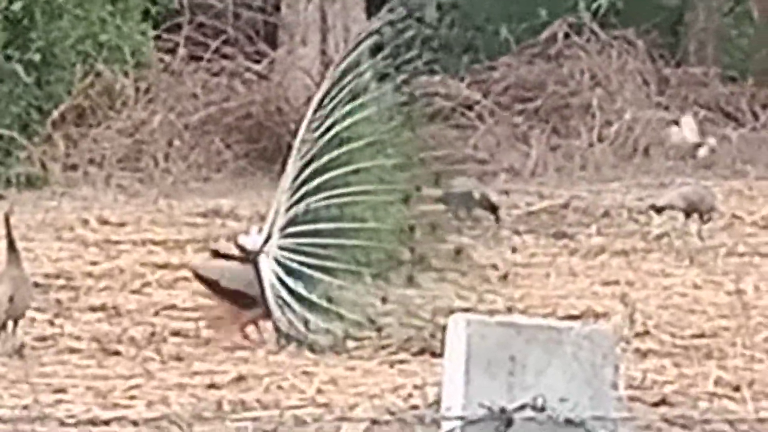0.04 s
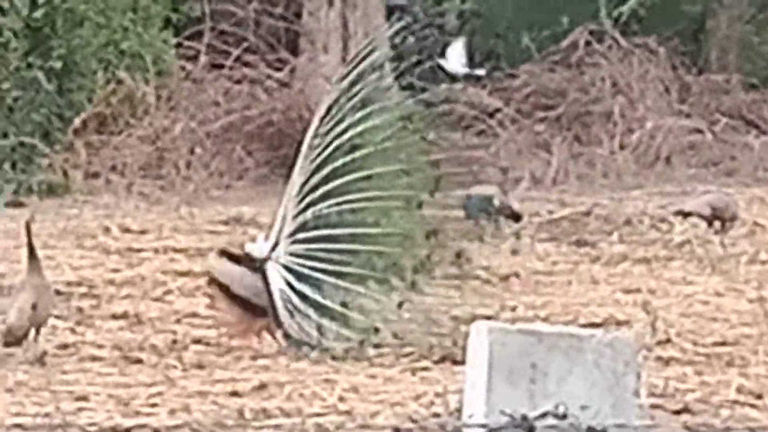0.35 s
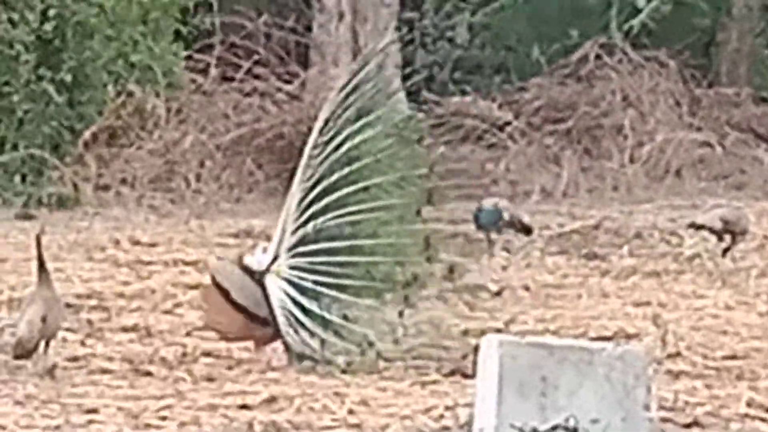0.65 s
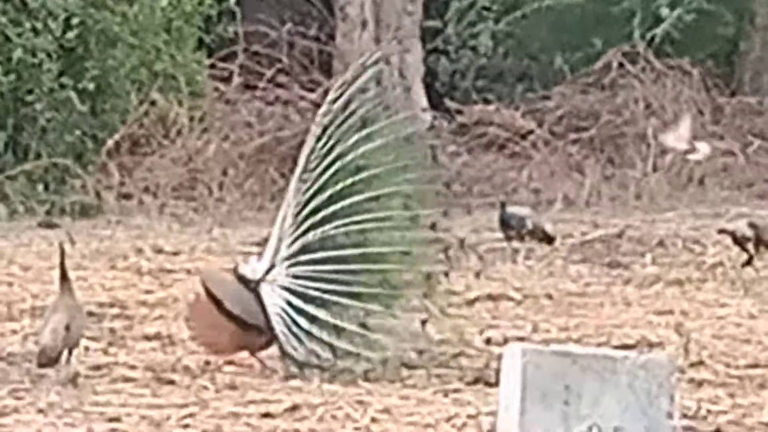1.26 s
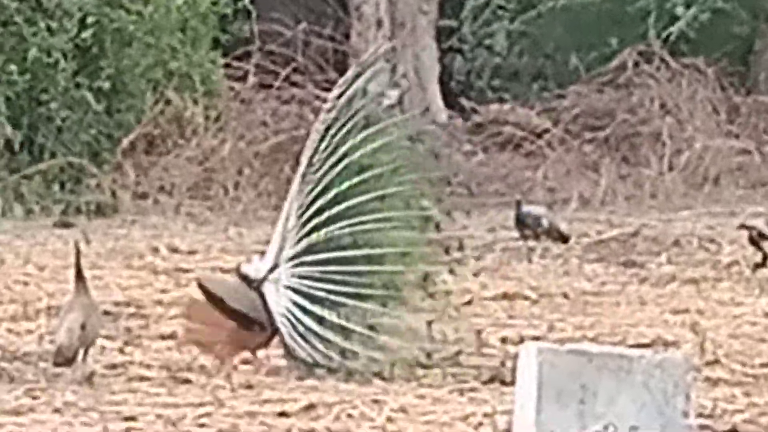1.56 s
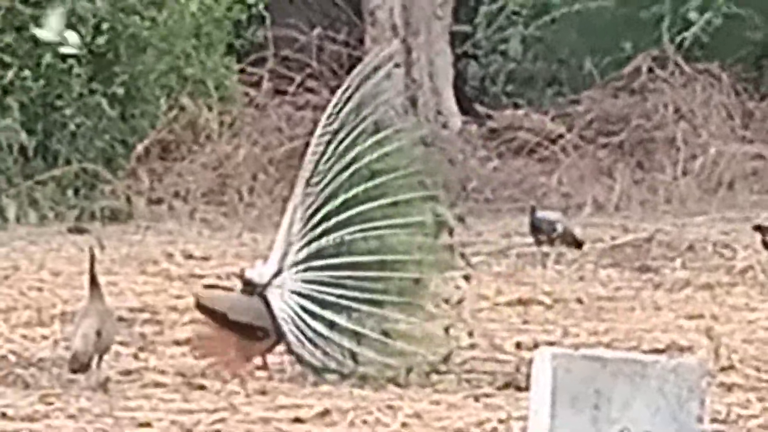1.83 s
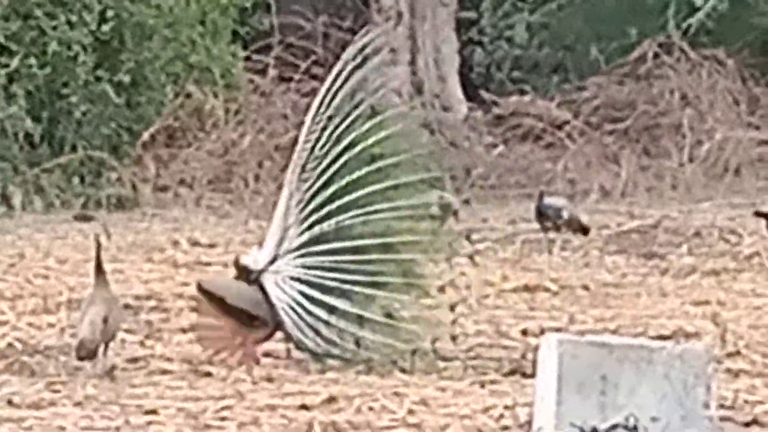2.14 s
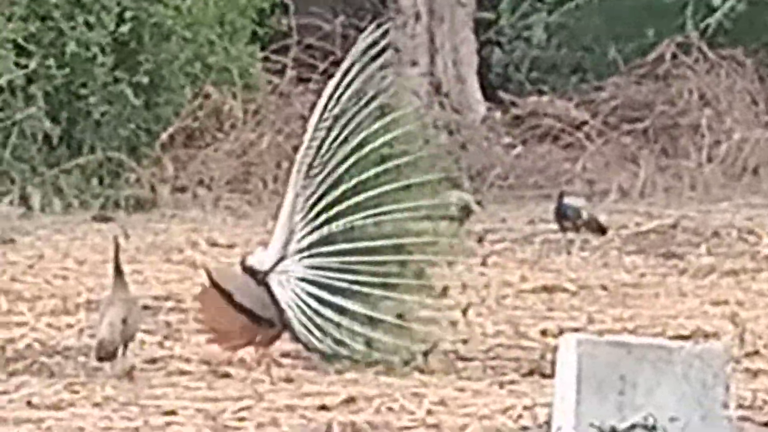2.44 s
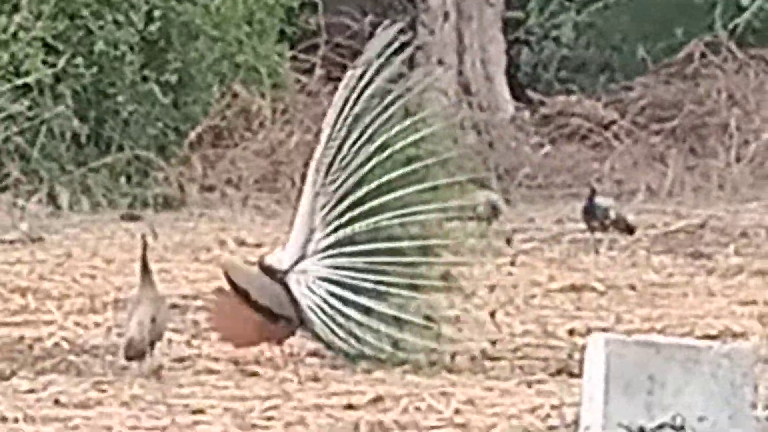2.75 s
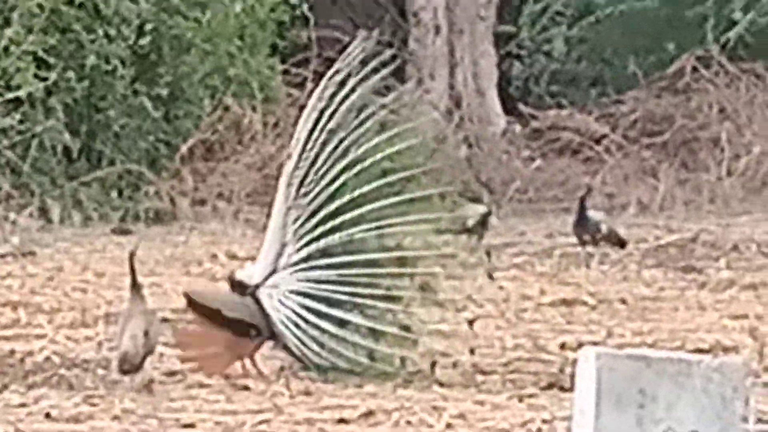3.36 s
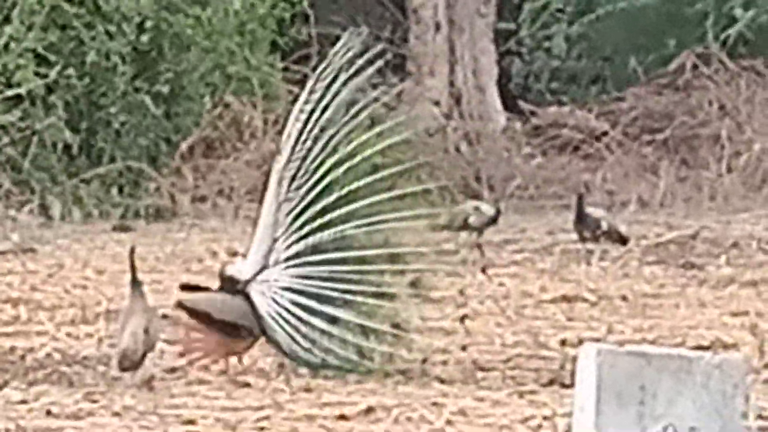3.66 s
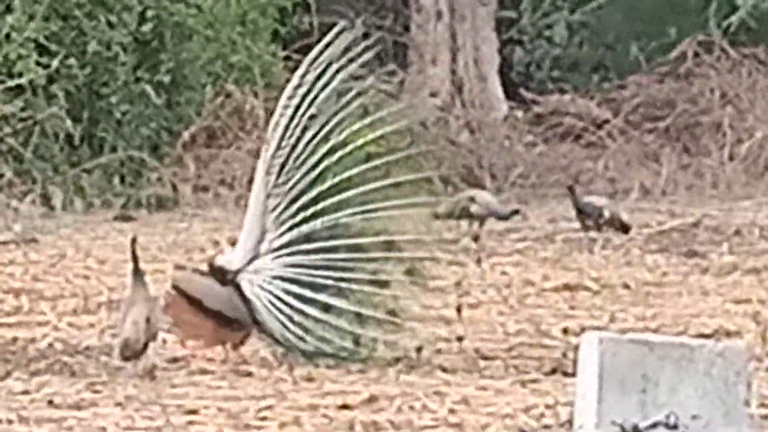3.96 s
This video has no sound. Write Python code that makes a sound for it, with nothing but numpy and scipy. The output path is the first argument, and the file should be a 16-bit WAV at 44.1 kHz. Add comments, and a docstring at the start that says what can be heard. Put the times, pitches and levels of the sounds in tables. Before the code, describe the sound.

Outdoors, a single-cylinder motorcycle approaches from the left, rumbling and rattling as it passes the microphone. It eases off and fades to the right with a few light ticks, while birds call faintly among softly rustling leaves.

```python
"""A single-cylinder motorcycle thumps past a field from left to right. Its firings excite the
resonances of the silencer, irregular clatter rings the metal, chain hiss pulses with the engine cycle,
and motion Doppler-shifts them. The drive whines and loose parts clink; then the throttle closes
and the machine putters away with a few light ticks. Birds whistle and chirp in gliding tones, which
reverberate faintly among the trees over a murmur of air and leaves."""
import sys
import numpy as np
from scipy import signal
from scipy.fft import rfft, irfft
from scipy.io import wavfile
from scipy.ndimage import map_coordinates

SR = 44100
rng = np.random.default_rng(int(sys.argv[2]) if len(sys.argv) > 2 else 0)


def unload_wav(signal):
    """Save mono or channel-first audio to the path in sys.argv[1] as 16-bit WAV at rate SR, clipped to [-1, 1]."""
    wavfile.write(
        sys.argv[1],
        SR,
        np.round(np.clip(np.atleast_2d(signal).T, -1, 1) * 32767).astype(np.int16),
    )


N = 176400
T = np.arange(N) / SR

PASSES_S, PASSING_S, SPEED_M_S, SOUND_M_S = .9, .55, 10, 343
FIRES_AT_S, THROTTLE_OFF_S, CLOSING_S = .815, 1.68, .084
# Engine speed as heard. Each row: time in seconds, firings per second.
FIRING_RATE = [(0, 27.9), (.45, 27.55), (.8, 27.35), (1.2, 27.0), (1.68, 26.6), (2.0, 23.1), (2.21, 26.7),
               (2.45, 24.4), (2.65, 25.8), (3.4, 24.5), (4, 24.1)]
# Direction. Each row: time in seconds, lead of the left ear in ms, pan of the clatter in dB.
BEARING = [(0, 0.31, -3.5), (.45, 0.26, -5.5), (.65, 0.21, -5.5), (.82, .14, -1), (1.05, 0.083, -1),
           (1.35, 0.015, -1.5), (2.5, -0.097, -5), (4, -0.21, 22)]
# Exhaust under throttle, and the thump that outlasts it. Each row: time in seconds, level in dB.
LOADED_LEVEL = [(0, -47.5), (.25, -44), (.5, -37.5), (.78, -33), (1.1, -32.5), (1.55, -43.5), (1.68, -50)]
THUMP_LEVEL = [(0, -65), (1.5, -58.5), (1.75, -54.5), (2.22, -53.5), (2.55, -59.5), (4, -65)]
# Silencer response under throttle and coasting, and its rounder tone from behind.
# Each row: frequency in Hz, gain in dB.
LOADED_RESPONSE = [(30, -66), (85, -44), (110, -23), (126, -11.5), (138, 5), (164, 2), (191, -3.5),
                   (245, -4.5), (300, -15), (330, -9.5), (420, -23.5), (1500, -68.5)]
THUMP_RESPONSE = [(38, -30), (50, 1), (74, 10), (105, 5.5), (140, -4), (250, -9), (900, -100)]
REAR_RESPONSE = [(136, 3.5), (190, 1.5), (250, -14)]
# Clatter. Each row: time in seconds, then untrimmed levels in dB of low mids, high mids, low treble, top.
CLATTER_LEVELS = [(0, -42, -47, -59.5, -64), (.28, -40, -45, -54.5, -60.5), (.62, -35.5, -37.5, -41, -44.5),
                  (.74, -36, -33, -40, -45.5), (.86, -34.5, -31, -46.5, -48.5),
                  (1.04, -35, -34.5, -46, -49.5), (1.2, -40, -38.5, -51.5, -49.5),
                  (1.64, -47, -50, -59, -60), (1.8, -55.5, -56, -66.5, -64.5),
                  (2.4, -68.5, -61.5, -64.5, -74)]
# Those four bands. Each row: low and high edge in Hz, trim in dB, beat depth from 0 to 1,
# lag in cycles, graininess in dB, left-right likeness from 0 to 1, pan in dB.
CLATTER_BANDS = [(340.6, 1220, -1.5, 0.12, .1, -0.5, 0.69, 4), (1230, 3700, -1.5, 0, 0.2, -2, 0.47, 5.5),
                 (3328, 5340, 0.5, 0.8, .25, -1, 0.56, 2.5), (5500, 18000, -1, 0.1, 0, -0.5, 0.24, 3.5)]
# Overall tone colour of the clatter, with a dip in the highest treble.
# Each row: frequency in Hz, gain in dB.
CLATTER_COLOUR = [(300, 1), (390, -5.5), (700, -7.5), (1230, -5), (1790, 6), (2700, 2.5), (3170, -7),
                  (4620, -11.5), (5350, -18), (6620, -16.5), (8320, -36.5), (12100, -43), (14000, -35)]
# Modes of fins, casings and tailpipe. Each row: frequency and width in Hz, gain coming and going in dB.
METAL_MODES = [(526, 46, -12.5, 4.5), (669, 37, -5.5, 13), (752, 68, -18.5, 12), (1655, 11.6, -3, 2.5),
               (2420, 34, -3.5, 6.5), (2724, 49, -11, 4.5), (3870, 30, 4, 1.5), (4545, 45, 10, 1.5),
               (6760, 330, -11.5, 4.5)]
# Two whines of the drive. Each row: time in seconds, frequency in Hz, level in dB.
LOW_WHINE = [(0, 985, -44), (.9, 976, -48), (1.6, 1005, -47.5), (1.85, 1062, -62), (2.5, 1064, -64),
             (4, 1077, -84.5)]
HIGH_WHINE = [(0, 2785, -60.5), (.8, 2863, -41), (1.7, 2824, -64), (2.7, 2770, -63), (4, 2730, -81)]
# Loose metal parts. Each row: start in seconds, frequency in Hz, relative level in dB.
CLINKS = [(0.317, 2900, -36.5), (0.788, 2826, -25.5), (.824, 2844, -32.5), (1.092, 2690, -31.5),
          (1.166, 2590, -37), (1.272, 2850, -34)]
# Light ticks. Each row: start in seconds, relative level in dB.
TICKS = [(1.857, -48), (2.047, -54), (2.144, -44.5)]
# Their spectrum. Each row: frequency in Hz, gain in dB.
TICK_SPECTRUM = [(500, 2), (1800, 9), (4500, 2), (6700, 13), (8000, -18), (15000, -52)]
# One bird's rising chirps, another's nasal falling squeals.
# Each row: start in seconds, relative level in dB.
CHIRPS = [(2.452, -69), (2.776, -69), (3.105, -68), (3.441, -69), (3.768, -70.5)]
SQUEALS = [(3.608, -70.5), (3.853, -72.5)]
CHIRP_HZ, SQUEAL_HZ = (3060, 3450, 4170, 4340, 4240), (2500, 2450, 2120, 1865, 1780)
# Slurred whistles and squawks. Each row: start and length in seconds, first, middle and last pitch
# in Hz, relative level in dB, overtone gain in dB, roughness from 0 to 1, pan in dB.
WHISTLES = [(0.013, 0.058, 3600, 4280, 4860, -66.5, -40, 0.15, -4),
            (1.835, 0.095, 4450, 3944, 3210, -72, -36, 0.25, -4),
            (2.245, 0.14, 2300, 2474, 2700, -73, -1, 0.2, 10.5),
            (2.56, 0.093, 1797, 1936, 2040, -70, -18, 0.25, 8),
            (2.621, 0.13, 1360, 1439, 1373, -52, -48, 0.08, 10),
            (2.83, 0.22, 1420, 1392, 1393, -62, -40, 0.49, 5),
            (2.878, 0.089, 4450, 4120, 3530, -79, -39, 0.3, 2.5),
            (3.108, 0.059, 2420, 2640, 2547, -74, -24, 1, -10),
            (3.289, 0.21, 3500, 3610, 3490, -75, -27, 0.79, 9.5),
            (3.308, 0.099, 1393, 1505, 1380, -71, -4, 0.66, 14),
            (3.375, 0.08, 4400, 3900, 3050, -69, -32, .55, -3),
            (3.395, 0.071, 2200, 1730, 1426, -75, 4, 0.4, 10)]
# Spectrum of the air over the field. Each row: frequency in Hz, relative level in dB.
AIR_SPECTRUM = [(25, -7), (70, 3.5), (160, 3), (230, -5), (420, -16), (750, -11.5), (1300, -21),
                (2500, -18), (3800, -19), (5200, -25.5), (7100, -23.5), (7900, -58.5)]


def motorcycle():
    """One crank times exhaust and chain hiss; a path difference brings sound to the nearer ear first."""
    emitted = emission_time()
    source_rate = np.interp(T, emitted, curve(FIRING_RATE) / np.gradient(emitted, T))
    cycle = np.cumsum(source_rate) / SR
    cycle -= np.interp(np.interp(FIRES_AT_S, T, emitted), T, cycle)  # one firing arrives at FIRES_AT_S
    engine = exhaust(cycle) + clatter(cycle)
    left, right = engine + whine(LOW_WHINE, width_hz=135) + whine(HIGH_WHINE, width_hz=140)
    lead_s = curve(BEARING) / 1000
    return np.array([left, resample(right, T - lead_s)])


def exhaust(cycle):
    """Source and filter: firings ring the silencer. With the throttle shut only a low thump remains."""
    throttle = np.clip(1 - (T - THROTTLE_OFF_S) / CLOSING_S, 0, 1)
    ahead, behind = (1 - recession()) / 2, np.clip(recession(), 0, 1)
    pipe = colour(firings(cycle, scatter_db=.8), LOADED_RESPONSE)
    pipe = pipe + undb(1.5) * ahead * resonate(pipe, hz=153.8, width_hz=6.8)  # higher from the front
    pipe = (1 - behind) * pipe + behind * colour(pipe, REAR_RESPONSE)
    loaded = unit(doppler(pipe)) * undb(curve(LOADED_LEVEL)) * throttle
    thump = colour(firings(cycle, scatter_db=1.7), THUMP_RESPONSE)
    thump = unit(doppler(thump)) * undb(curve(THUMP_LEVEL))
    return (loaded + thump) * pan(1)


def firings(cycle, scatter_db):
    """Combustion as an impulse train: one pulse per cycle, each of its own strength."""
    pulses = np.diff(np.floor(cycle), prepend=np.floor(cycle[0]))
    return pulses * undb(scatter_db * rng.standard_normal(N))


def clatter(cycle, fade_db_per_s=15):
    """Forced vibration: near-steady rasp, irregular clatter and pulsing chain hiss ring the metal."""
    out, going = 0, (1 + recession()) / 2
    receding_db = -fade_db_per_s * np.maximum(T - CLATTER_LEVELS[-1][0], 0)
    for k, (low_hz, high_hz, trim_db, depth, lag, grain_db, alike, pan_db) in enumerate(CLATTER_BANDS):
        beat = 1 - depth + 2 * depth * np.exp(-((cycle - lag) % 1) / .69)
        shared = np.sqrt(alike) * rng.standard_normal(N)
        noise = shared + np.sqrt(1 - alike) * rng.standard_normal((2, N))
        force = noise * beat * (undb(grain_db * wander(300)) + rattle())
        ringing = sum(undb(front_db + (rear_db - front_db) * going) * resonate(force, hz, width_hz)
                      for hz, width_hz, front_db, rear_db in METAL_MODES)
        heard = doppler(band(colour(force + ringing, CLATTER_COLOUR), low_hz, high_hz))
        if k in (1, 2):  # high mids and low treble
            heard = reflections(heard)
        level_db = curve(CLATTER_LEVELS, column=k + 1) + trim_db + receding_db
        out = out + heard / heard.mean(axis=0).std() * undb(level_db) * pan(pan_db)
    return out * pan(curve(BEARING, column=2))


def rattle(hits_per_s=150, scatter_db=3, decay_s=.003, relative_db=-8):
    """Impacts of loose metal form a Poisson process; the force of each decays exponentially."""
    hits = rng.random(N) < hits_per_s / SR
    strength = undb(scatter_db * np.clip(rng.standard_normal(N), -2, 2))
    force = signal.lfilter([1], [1, -np.exp(-1 / (decay_s * SR))], hits * strength)
    return undb(relative_db) * unit(force)


def whine(rows, width_hz):
    """Random modulation spreads a tone of the drive into a narrow, wavering band."""
    carrier = np.exp(2j * np.pi * np.cumsum(curve(rows)) / SR)
    modulators = (wander(width_hz) + 1j * wander(width_hz) for _ in range(3))
    shared, left, right = (unit((carrier * modulator).real) for modulator in modulators)
    return unit(shared + .5 * np.array([left, right])) * undb(curve(rows, column=2))


def clinks(width_hz=54, decay_s=.011):
    """Resonance: each loose part buzzes in one mode under a brief noisy force."""
    out = 0
    for start, hz, db in CLINKS:
        force = burst(start, db, decay_s) * rng.standard_normal((2, N))
        out = out + resonate(force, hz, width_hz)
    return band(out * np.sqrt(SR / np.pi / width_hz), 1700, 4200)


def ticks():
    """Broadband transients: noise that decays within milliseconds is heard as bright ticks."""
    envelope = sum(burst(start, db, decay_s=.0022) for start, db in TICKS)
    return colour(envelope * rng.standard_normal((2, N)), TICK_SPECTRUM)


def recession():
    """Radial share of the velocity on a straight path: towards -1 coming, towards +1 going."""
    return (T - PASSES_S) / np.hypot(T - PASSES_S, PASSING_S)


def emission_time():
    """Time at the moving source, which seems to run fast on approach and slow in retreat."""
    return .05 + np.cumsum(1 - SPEED_M_S / SOUND_M_S * recession()) / SR


def doppler(x):
    """Doppler effect: waves are compressed ahead of the machine and stretched behind it."""
    return np.array([resample(channel, emission_time()) for channel in np.atleast_2d(x)])


def reflections(x, paths=10, spread_s=.02, drift_s_per_s=.002, relative_db=-12):
    """Interference: paths off banks and trunks change as the machine moves, so notches wander."""
    out, gain = x, undb(relative_db)
    for lag, drift in rng.uniform(-1, 1, (paths, 2)):
        delay_s = spread_s * (1 + lag) / 2 + drift_s_per_s * drift * (T - PASSES_S)
        out = out + gain * np.array([np.interp(T - delay_s, T, channel) for channel in x])
    return out / np.sqrt(1 + paths * gain ** 2)


def birds():
    """Bird calls arrive directly and by scattering, briefly from leaves and longer from the trees."""
    calls = sum(bird_note(start, .09, CHIRP_HZ, db, overtone_db=-48, rough=.2, attack=.52, release=.37)
                for start, db in CHIRPS)
    for start, length_s, *pitches, db, overtone_db, rough, pan_db in WHISTLES:
        calls = calls + bird_note(start, length_s, pitches, db, overtone_db, rough) * pan(pan_db)
    for start, db in SQUEALS:
        squeal = bird_note(start, .1, SQUEAL_HZ, db, overtone_db=0, rough=.42, release=.6)
        calls = calls + squeal * pan(11)
    calls = band(calls, 1540, 7000)
    leaves = undb(-11) * reverberation(calls, t60_s=.14)
    trees = undb(-8) * reverberation(calls, t60_s=.95)
    return undb(7) * (calls + leaves + trees)


def bird_note(start, length_s, pitches, db, overtone_db, rough, attack=.13, release=.21):
    """A gliding tone turns nasal as its harmonics grow; modulation of pitch and level roughens it."""
    progress = (T - start) / length_s  # attack and release are shares of this span
    sounding = (progress > 0) & (progress < 1)
    progress, out = progress[sounding], np.zeros(N)
    shake, flutter = (np.interp(progress * length_s * 450, np.arange(200), row)
                      for row in rng.standard_normal((2, 200)))
    glide_hz = np.interp(progress, np.linspace(0, 1, len(pitches)), pitches)
    phase = 2 * np.pi * np.cumsum(glide_hz * (1 + .0584 * rough * shake)) / SR
    overtones = progress * (np.sin(2 * phase) + progress * np.sin(3 * phase))
    envelope = np.clip(np.minimum(progress / attack, (1 - progress) / release), 0, 1)
    amplitude = np.sqrt(2) * envelope * undb(db + 2.5 * rough * flutter)
    out[sounding] = amplitude * (np.sin(phase) + undb(overtone_db) * overtones)
    return out


def reverberation(x, t60_s):
    """A diffuse field decays exponentially, with a different response at each ear."""
    tail = unit(rng.standard_normal((2, SR)) * np.exp(-np.log(1000) * T[:SR] / t60_s)) / np.sqrt(SR)
    return signal.fftconvolve(x, tail, axes=1)[:, :N]


def field_air(level_db=-59.5, wide_above_hz=580):
    """Diffuse murmur of air and leaves, more coherent between the ears at long wavelengths."""
    mid, apart = rng.standard_normal((2, N))
    side = .14 * apart + .89 * signal.lfilter(*signal.butter(1, wide_above_hz, "high", fs=SR), apart)
    air = colour(np.array([mid + side, mid - side]), AIR_SPECTRUM)
    return unit(air) * undb(level_db + .37 * wander(5.2))


def undb(db):
    """Decibels to amplitude ratio."""
    return 10 ** (np.asarray(db) / 20)


def unit(x):
    """Normalisation to rms 1."""
    return x / np.sqrt(np.mean(x ** 2))


def curve(rows, column=1):
    """Linear interpolation of one column in time."""
    rows = np.array(rows)
    return np.interp(T, rows[:, 0], rows[:, column])


def pan(db):
    """Gains for an interaural level difference; positive is left."""
    return undb(np.array([db, -db]).reshape(2, -1) / 2)


def burst(start, db, decay_s):
    """Sudden onset and exponential decay."""
    return undb(db) * (T >= start) * np.exp(-np.abs(T - start) / decay_s)


def wander(rate_hz):
    """Smooth random fluctuation with a spread near 1."""
    return map_coordinates(rng.standard_normal(N // 10), [T * rate_hz], order=3, mode="wrap")


def resample(x, times_s):
    """Cubic interpolation of a wave at the given times."""
    return map_coordinates(x, [times_s * SR], order=3, mode="mirror")


def colour(x, points):
    """Minimum-phase filter through (Hz, dB) points."""
    hz, db = np.array(points).T
    gain_db = np.interp(np.log(np.fft.rfftfreq(2 * N, 1 / SR) + 1), np.log(hz), db)
    cepstrum = irfft(np.log(undb(gain_db)))[:N]
    cepstrum[0] /= 2
    return irfft(rfft(x, 2 * N) * np.exp(2 * rfft(cepstrum, 2 * N)))[..., :N]


def band(x, low_hz, high_hz):
    """Steep band-pass filter."""
    return signal.sosfilt(signal.butter(5, [low_hz, high_hz], "band", fs=SR, output="sos"), x)


def resonate(x, hz, width_hz):
    """A damped resonator with gain 1 at its centre."""
    return signal.lfilter(*signal.iirpeak(hz, hz / width_hz, fs=SR), x)


def scene():
    """Superposition of the motorcycle, clinks, ticks, birds and open air."""
    return motorcycle() + clinks() + ticks() + birds() + field_air()


def record(dry):
    """A steep low-pass filter removes the treble above 15.5 kHz."""
    return signal.sosfilt(signal.ellip(8, .2, 70, 15500, fs=SR, output="sos"), dry)


dry = scene()
out = record(dry)
unload_wav(out)
```